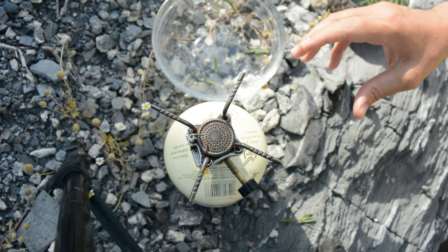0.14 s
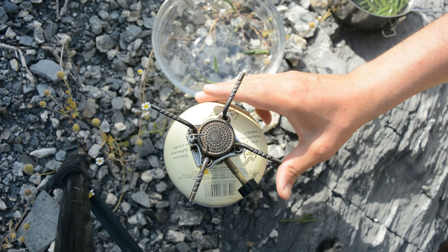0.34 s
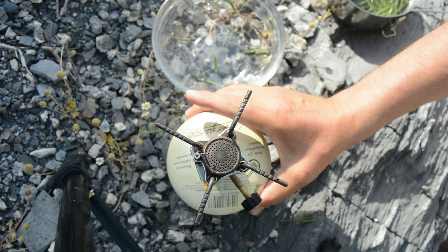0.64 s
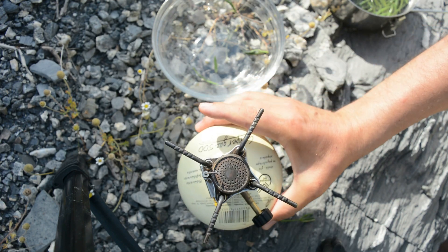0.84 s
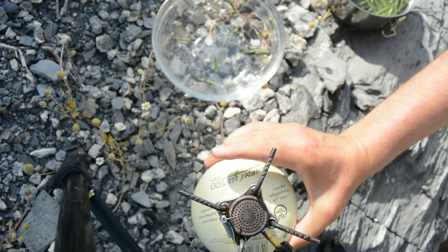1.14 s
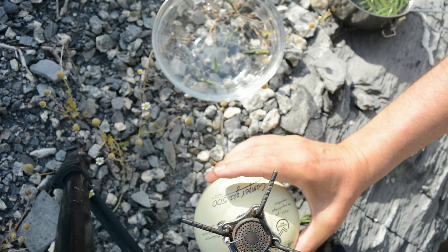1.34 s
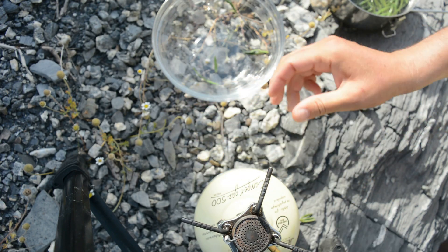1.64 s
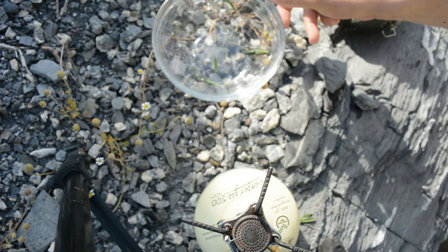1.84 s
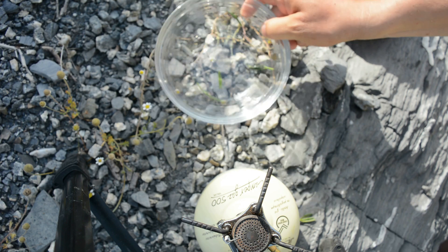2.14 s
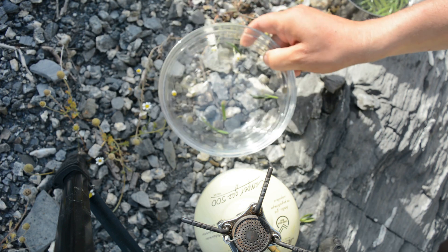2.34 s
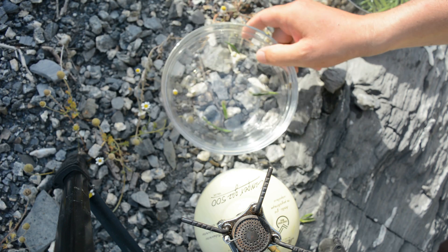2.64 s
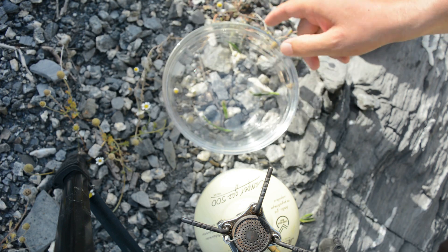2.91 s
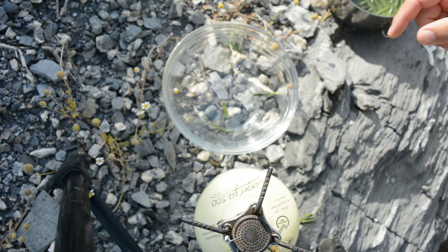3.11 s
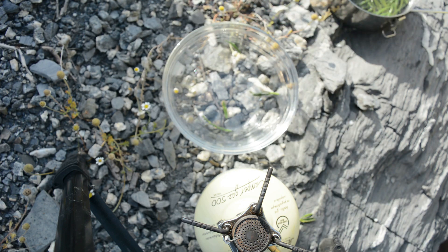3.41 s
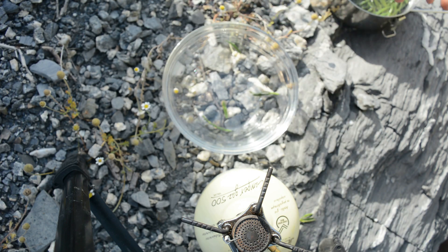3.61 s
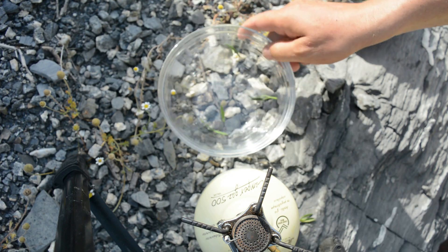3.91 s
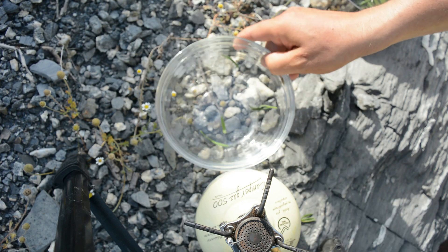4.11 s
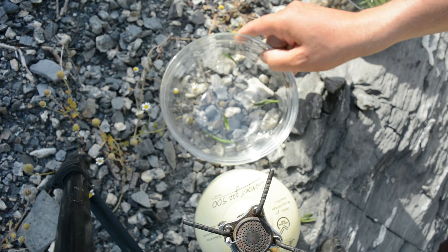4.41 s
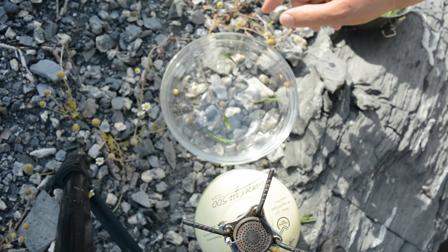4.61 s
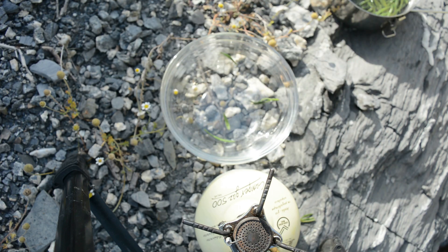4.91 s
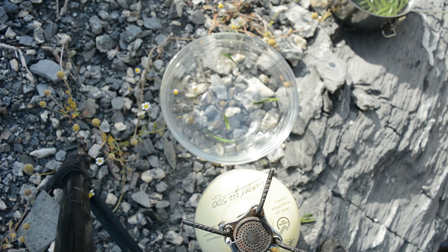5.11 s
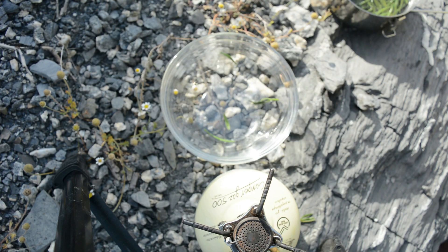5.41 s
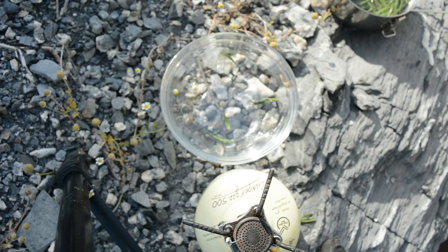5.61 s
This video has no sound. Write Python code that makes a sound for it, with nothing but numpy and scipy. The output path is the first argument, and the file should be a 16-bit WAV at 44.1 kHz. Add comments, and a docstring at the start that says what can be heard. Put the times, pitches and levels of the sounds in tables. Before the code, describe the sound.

A quiet open stony slope, with a faint, soft, slightly wavering rush of air throughout. From about 0.5 s a gas canister with stove arms is shoved over slate gravel in short jerks: faint grit first, then scrapes from 0.67 s with ringing steel, small pings around 0.9 s, and the strongest crunches, pings and a low thud near 1.2 s, dwindling by 1.5 s. From 1.9 to 2.75 s a clear bowl is nudged: quiet hollow rim rubs, dry ticks and high tinkling slate chips, with a bright clink at 2.03 s. Near-silence follows until 3.9 s, when more nudges lead to a light, briefly ringing clank at 4.13 s, then fainter rubs until 4.5 s. From 5.04 s fingers rub the camera; hard, close, short knocks hit at 5.16, 5.33 and 5.39 s, the loudest at 5.48 s, overloading with a thump, then a smaller one at 5.67 s.

```python
"""A hand drags a gas canister with its stove over slate gravel: grit slips and stone hits ring the steel shell.
A clear bowl is then nudged along: its rim rubs and ticks, slate chips tinkle, and it drops with a clank.
At the end the hand takes hold of the camera: filtered slips and short modes make the rubs and hard knocks.
Behind it lies a quiet stony slope, its air made of slowly wandering coloured noise."""
import sys
import numpy as np
from scipy import signal
from scipy.fft import rfft, irfft, next_fast_len
from scipy.io import wavfile
from scipy.ndimage import uniform_filter1d, map_coordinates

SR = 44100
rng = np.random.default_rng(int(sys.argv[2]) if len(sys.argv) > 2 else 0)


def inscribe(sig):
    """Save sig as 16-bit PCM at rate SR to the path in sys.argv[1].

    A 1-D sig is mono; a 2-D sig holds one channel per row.
    Samples are clipped to [-1, 1] before scaling.
    """
    pcm = np.round(np.clip(np.atleast_2d(sig).T, -1, 1) * 32767)
    wavfile.write(sys.argv[1], SR, pcm.astype(np.int16))


N = 253571
TIME = np.arange(N) / SR
AGE = np.arange(SR // 2) / SR  # seconds since a blow


def amp(db):
    """Decibels to gain."""
    return 10 ** (np.asarray(db) / 20)


def unit(x):
    """Scale to rms 1."""
    return x / np.std(x)


def peak(x):
    """Scale so that the loudest two milliseconds crest near 1."""
    loudest_power = uniform_filter1d(x * x, size=96).max()
    return x / (2 * np.sqrt(loudest_power))


def add(track, start_s, sound):
    """Mix a sound into a track."""
    i = int(start_s * SR)
    track[i:i + len(sound)] += sound[:N - i]


def through(x, response):
    """Pass a force through an impulse response."""
    return signal.oaconvolve(x, response)[:len(x)]


def colour(x, points, size=2048):
    """Minimum-phase filter through (frequency [Hz], level [dB]) points."""
    hz, db = np.transpose(points)
    bins_hz = np.maximum(np.fft.rfftfreq(size, 1 / SR), 1)
    gain = amp(np.interp(np.log(bins_hz), np.log(hz), db))
    cepstrum = irfft(np.log(gain))
    cepstrum[1:size // 2] *= 2
    cepstrum[size // 2 + 1:] = 0
    return through(x, irfft(np.exp(rfft(cepstrum))))


def fade(t60_s):
    """Exponential decay after a blow."""
    return np.exp(-np.log(1000) * AGE / t60_s)


def ring(modes, scatter_db, weight_db=0):
    """Decaying modes; each point of contact gives them other strengths and signs."""
    hz, db, t60_s = np.transpose(modes)
    scatter = scatter_db * rng.standard_normal(len(hz))
    gain = amp(db + weight_db + scatter) * rng.choice([-1, 1], len(hz))
    swing = gain @ (np.sin(2 * np.pi * hz[:, None] * AGE) * fade(t60_s[:, None]))
    # a small body radiates little below its lowest mode
    return signal.sosfilt(signal.butter(1, hz.min() / 2, "high", fs=SR, output="sos"), swing)


def favour(modes, hz, boost_db):
    """Mode weights in dB for a contact that picks out the mode nearest to hz."""
    distance_hz = abs(np.array(modes)[:, 0] - hz)
    return boost_db * (distance_hz == distance_hz.min())


def burst(points, t60_s):
    """A crack: decaying noise for many short unresolved modes under one spectrum."""
    return peak(colour(rng.standard_normal(len(AGE)) * fade(t60_s), points))


def soften(x, cutoff_hz, order=2):
    """A softer contact pushes for longer and loses the treble."""
    return signal.sosfilt(signal.butter(order, cutoff_hz, fs=SR, output="sos"), x)


def springy(x, hz, q):
    """A springy contact lifts its own resonance and cuts what lies above."""
    b, a = signal.bilinear([1], [1, 1 / q, 1], fs=.5 / np.tan(np.pi * hz / SR))
    return signal.lfilter(b, a, x)


def walk(rate_hz):
    """Random wander, straight between random points, spread near 1."""
    points = rng.standard_normal(4096)
    return np.interp(TIME * rate_hz, np.arange(len(points)), points)


def friction(slips_per_s, spread_db, catch_db, catch_hz):
    """Dense tiny slips of uneven size whose strength wanders as the surfaces catch."""
    slips = (rng.random(N) < slips_per_s / SR) * rng.choice([-1, 1], N)
    size_db = spread_db * np.minimum(rng.exponential(size=N), 4)
    return unit(slips * amp(size_db + catch_db * walk(catch_hz)))


def strokes(rows, attack_s, release_t60_s, swell_db_per_s):
    """One gain track per dB column: each stroke sets in, swells to its level, then dies away."""
    power = 0
    for start_s, length_s, *levels_db in rows:
        left_s = start_s + length_s - TIME
        attack = np.clip((TIME - start_s) / attack_s, 0, 1)
        swell = amp(-swell_db_per_s * np.clip(left_s, 0, length_s))
        release = np.exp(np.log(1000) * np.minimum(left_s, 0) / release_t60_s)
        power = power + np.outer(amp(levels_db), attack * swell * release) ** 2
    return np.sqrt(power)


def slosh(x, rate_hz, bend, crest_s):
    """Liquid gas swings in the canister and bends its modes up and down by a small share."""
    turn = 2 * np.pi * rate_hz
    warped_s = TIME + bend / turn * np.sin(turn * (TIME - crest_s))
    return map_coordinates(x, [warped_s * SR], order=3)


def place(x, pan_db, lead_samples):
    """The camera body shades the treble at one port; positive values favour the left and let it lead."""
    size = next_fast_len(N)
    hz = np.fft.rfftfreq(size, 1 / SR)
    treble = hz ** 2 / (hz ** 2 + 5000 ** 2)
    shade = amp(pan_db / 2 * treble) * np.exp(1j * np.pi * hz * lead_samples / SR)
    return irfft(rfft(x, size) * np.array([shade, 1 / shade]), size)[:, :N]


# open air, common and opposed parts: (frequency [Hz], density [dB per Hz])
AIR_MID = [(15, -48), (25, -25), (59, -10), (95, -7.5), (115, -3), (168, -4.5), (208, -1), (385, -2.5),
           (490, -0.5), (640, -0.5), (957, -0.5), (1470, -2), (1640, -3.5), (4070, -12), (15100, -27.5)]
AIR_SIDE = [(15, -39), (25, -5), (101, -15.5), (294, -5), (517, -3), (712, -0.5), (2720, -7.5),
            (11000, -22.5), (15100, -32)]
AIR_DB = -58


def air():
    """A soft far rush over the slope: noise with a common part and a weaker opposed part at the ports."""
    mid = unit(colour(rng.standard_normal(N), AIR_MID))
    side = unit(colour(rng.standard_normal(N), AIR_SIDE))
    level = amp(AIR_DB + 0.95 * walk(rate_hz=2.83))
    return level * (mid + amp(-2) * side * np.array([[1], [-1]]))


# fingers sliding over the housing: (start [s], length [s], level [dB])
FINGER_SLIDES = [(5.036, .085, -40.5), (5.123, 0.093, -35.5), (5.326, .03, -42), (5.385, .02, -41.5),
                 (5.47, 0.05, -45.5), (5.622, 0.1, -52)]
FINGER_ATTACK_S, FINGER_RELEASE_T60_S, FINGER_SWELL_DB_PER_S = 0.0073, 0.23, 22
# skin on housing: (frequency [Hz], level [dB])
SKIN = [(60, -14), (170, -1), (330, 2), (700, 6), (1200, 4), (2200, -2), (4000, -16), (8500, -22.5),
        (12000, -37), (13500, -47), (15500, -42)]
# knocks: (time [s], level [dB], contact resonance [Hz], thump re body [dB], snap re body [dB])
KNOCKS = [(5.1264, -21.5, 1390, -3, -27), (5.1361, -26, 1090, 1.5, -32), (5.158, -1, 3140, -27, -19),
          (5.1609, -11.5, 2500, -30, -29), (5.164, -12, 2210, -30, -10), (5.173, -18, 1200, -4, -27),
          (5.2131, -19, 1580, -8, -12.5), (5.326, -9, 2730, -11.5, -5), (5.358, -26, 2500, -2, -30),
          (5.3933, -4.5, 2040, -16, -10.5), (5.4039, -16, 2500, -5, -21), (5.451, -20, 1550, -10, -21),
          (5.4545, -10, 2330, -8.5, -18.5), (5.4831, 4.5, 3700, -24, -.5), (5.486, -2, 1600, -24, -16),
          (5.627, -26.5, 660, -10, -22), (5.665, -10.5, 2330, -27.5, -30)]
# housing modes and low thump modes: (frequency [Hz], level [dB], t60 [s])
HOUSING = [(604, -16, 0.093), (765, -3, 0.013), (1020, 0.5, 0.054), (1200, 5, 0.032), (1500, 3.5, 0.029),
           (1580, 2, 0.03), (1734, 2, 0.037), (1920, 4, 0.025), (2220, 0, 0.022), (2500, 3, 0.014),
           (2850, 2, 0.02), (3100, 3.5, 0.0089), (3385, 1, 0.018), (3840, -2.5, 0.019), (4280, -3, 0.023),
           (4840, -6.5, 0.024), (5190, -5, 0.034)]
THUMP = [(195, -12, 0.066), (277, -0.5, 0.11), (365, 3, 0.092), (437, 0, 0.089), (534, -6, 0.068)]
# snap of a hard contact, faint after-ring: (frequency [Hz], level [dB])
SNAP = [(100, -14), (400, 0.5), (1500, 1.5), (3500, -2), (6000, -1), (9000, -1.5), (11000, -10),
        (13500, -10), (15500, -24)]
AFTER_RING = [(100, -17), (370, 7), (650, -20), (1100, 8), (1700, -5), (2500, -3), (5200, -7.5),
              (8200, -7.5), (15000, -30)]
# small housing creaks: (time [s], level [dB], cut-off [Hz])
CREAKS = [(5.121, -38, 12000), (5.193, -31.5, 10000), (5.231, -37, 12000), (5.435, -37.5, 6000),
          (5.610, -31.5, 6860), (5.6369, -23.5, 5000), (5.643, -34, 7000), (5.700, -40.5, 8000),
          (5.716, -33, 8950)]
# low thump as the hardest knock overloads the input: (frequency [Hz], level [dB])
OVERLOAD_THUMP = [(20, -11), (110, -7), (220, -2), (380, 4), (650, -7), (2000, -39), (15000, -59)]
OVERLOAD_THUMP_S, OVERLOAD_THUMP_DB = 5.4835, -13


def camera():
    """Fingers rub the housing and knock it: a snap, short body modes, a low thump and a faint after-ring."""
    rub_gain, = strokes(FINGER_SLIDES, FINGER_ATTACK_S, FINGER_RELEASE_T60_S, FINGER_SWELL_DB_PER_S)
    slips = friction(slips_per_s=3000, spread_db=1.5, catch_db=4, catch_hz=80)
    rub = unit(colour(slips, SKIN)) * rub_gain
    knocks = np.zeros(N)
    for time_s, db, contact_hz, thump_db, snap_db in KNOCKS:
        body = peak(ring(HOUSING, scatter_db=0.5)) + amp(-3) * burst(SKIN, t60_s=0.041)
        thump = peak(ring(THUMP, scatter_db=1.0))
        snap = soften(burst(SNAP, t60_s=0.017), 3.76 * contact_hz, order=6)
        knock = peak(springy(body, contact_hz, q=1.66)) + amp(thump_db) * thump + amp(snap_db) * snap
        after_ring = amp(-42.0) * burst(AFTER_RING, t60_s=0.49)
        add(knocks, time_s, amp(db) * (knock + after_ring))
    for time_s, db, cutoff_hz in CREAKS:
        add(knocks, time_s, amp(db) * soften(burst(SNAP, t60_s=0.017), cutoff_hz))
    # the stiff little housing hardly moves in the bass
    knocks = signal.sosfilt(signal.butter(2, 210, "high", fs=SR, output="sos"), knocks)
    add(knocks, OVERLOAD_THUMP_S, amp(OVERLOAD_THUMP_DB) * burst(OVERLOAD_THUMP, t60_s=0.014))
    return place(rub + knocks, pan_db=4.5, lead_samples=-0.084)


# slate chip modes: (frequency [Hz], level [dB], t60 [s])
CHIP = [(5290, -6.5, 0.068), (8220, 3.5, 0.037), (8520, -6.5, 0.026), (9890, -9.5, 0.068),
        (10650, -21, 0.024), (11600, -27, .05), (11600, -17, 0.073), (12700, -20, .06)]
# clinks: (time [s], level [dB], favoured mode [Hz], its boost [dB])
CLINKS = [(1.913, -48, 8220, 10), (1.92, -43.5, 8220, 22), (1.984, -40.5, 8220, 3),
          (2.030, -26.5, 5290, 14.5), (2.308, -40, 8220, 4), (2.328, -32, 8220, 10), (2.359, -42, 5290, 17),
          (2.386, -47, 10650, 39), (2.404, -53, 10650, 34), (2.723, -51.5, 8220, 7), (3.959, -45, 8220, 8),
          (3.993, -29, 9890, 8.5)]
# crushed grit: (frequency [Hz], level [dB])
CRUNCH = [(50, -42), (300, -25), (800, -2), (1500, -11), (2800, -7.5), (5000, 5.5), (8000, 2), (11000, -1),
          (13000, -32), (15500, -33)]


def chips(tinkle_gain):
    """Thin slate chips tinkle as the rim pushes them over each other."""
    chip_ring = ring(CHIP, scatter_db=.5)
    slips = friction(slips_per_s=760, spread_db=4.5, catch_db=4.0, catch_hz=67)
    out = unit(through(slips, chip_ring)) * tinkle_gain
    for time_s, db, hz, boost_db in CLINKS:
        clink = peak(ring(CHIP, 0.39, favour(CHIP, hz, boost_db)))
        add(out, time_s, amp(db) * (clink + amp(-11.0) * burst(CRUNCH, t60_s=0.035)))
    return place(out, pan_db=1.4, lead_samples=.2)


# rim rubbing on stones: (frequency [Hz], level [dB])
RUB = [(50, -52), (150, -29), (450, -14), (750, 2.5), (950, 9), (1300, -4), (1850, -2), (2700, -19),
       (3500, -11.5), (6000, -34), (15000, -43)]
# rim catching on stones: (time [s], peak [dB], contact cut-off [Hz])
BOWL_TICKS = [(2.026, -32, 6000), (2.075, -34, 1800), (2.302, -25.5, 3000), (2.306, -24, 2940),
              (2.3185, -32, 3500), (2.328, -38, 4000), (2.334, -26, 3000), (2.353, -27, 3500),
              (2.361, -30, 3500), (2.384, -34.5, 6000), (2.458, -35.5, 2500), (2.467, -25, 3900),
              (2.481, -39, 3000), (2.511, -35, 1500), (2.597, -32.5, 1990), (2.609, -28.5, 2970),
              (2.669, -31, 1480), (2.722, -30, 2100), (2.7323, -29, 1770), (2.752, -29.5, 1480),
              (3.958, -29, 2500), (3.982, -41, 2000), (3.9923, -27.5, 8000), (4.0853, -25.5, 2600),
              (4.113, -46, 2000), (4.320, -34.5, 1800), (4.397, -45.5, 6000), (4.419, -43, 6000)]
# bowl damped by fingers; bowl free, before the length factor: (frequency [Hz], level [dB], t60 [s])
BOWL_HELD = [(746, -39.5, 1), (783, -6, 0.011), (884, -2, 0.021), (1051, -3.5, 0.019), (1200, -8, 0.018),
             (1463, -14.5, 0.034), (1820, -17, 0.031), (2100, -6, 0.0064), (3330, -9, 0.0016),
             (4040, -0.5, 0.002)]
BOWL_FREE = [(748.6, 0.5, 0.12), (767, -30, 0.31), (771, -1, 0.064), (1491, -21, 0.37), (1690, -13, .16),
             (1765, -9, 0.035), (1840, -4, 0.057), (1820, -12, 0.026), (2040, -13, 0.071), (2153, -14, .12),
             (2321, -27.5, 0.64), (2730, -7, 0.16), (2880, -20, 0.051), (3385, -20, 0.11), (3670, -19, .17),
             (4113, -19, 0.13), (4710, -18, .08), (5095, -18, 0.097), (5570, -25, 0.1), (6971, -26, .06),
             (7280, -19, 0.094), (8760, -20, 0.095), (9350, -8, 0.03), (9860, -15.5, 0.1),
             (10800, -21, 0.06)]
# let go, drop and chatter:
# (time [s], level before softening [dB], crack re ring [dB], contact cut-off [Hz], ring length factor [1])
DROPS = [(2.753, -44, -27, 800, 11), (4.1305, -15, -9, 15000, 1.2), (4.153, -29, -1, 12100, 0.67),
         (4.160, -27, -2.5, 11800, 0.78), (4.397, -39, -3, 6900, 0.52)]
# cracking stone, stone bed: (frequency [Hz], level [dB])
GRIT = [(50, -50), (170, -18), (400, -8.5), (820, 10.5), (1400, 1), (2600, 2.5), (5000, -4), (8000, -10.5),
        (11000, -17.5), (12800, -29), (15500, -32)]
THUD = [(50, -44), (130, -35), (250, -16), (420, -2), (650, -0.5), (850, -2), (1400, -25), (4000, -39),
        (15000, -60)]


def bowl(rub_gain):
    """The held rim rubs and ticks with little ring; let go, it drops on a stone and rings freely."""
    slips = friction(slips_per_s=560, spread_db=2.0, catch_db=-0.5, catch_hz=170)
    out = unit(colour(slips, RUB)) * rub_gain
    for time_s, db, contact_hz in BOWL_TICKS:
        tick = peak(ring(BOWL_HELD, scatter_db=3.5)) + amp(-17.5) * burst(GRIT, t60_s=0.029)
        add(out, time_s, amp(db) * peak(soften(tick, contact_hz)))
    for time_s, db, crack_db, contact_hz, length_factor in DROPS:
        crack = burst(GRIT, t60_s=0.071)
        crack += amp(-6) * burst(THUD, t60_s=0.076)
        crack += amp(-4.5) * burst(SNAP, t60_s=0.024)
        modes = np.array(BOWL_FREE) * [1, 1, length_factor]
        clank = peak(ring(modes, scatter_db=3.0)) + amp(crack_db) * crack
        add(out, time_s, amp(db) * soften(clank, contact_hz))
    return place(out, pan_db=3.0, lead_samples=0.32)


# short shoves: (start [s], length [s], shell ring [dB], grit [dB])
SHOVES = [(.49, 0.24, -62.5, -60.5), (.668, 0.055, -46.5, -50), (.749, 0.067, -41, -43),
          (.864, 0.068, -44, -51.5), (.952, 0.053, -40.5, -44.5), (1.035, 0.11, -44.5, -48),
          (1.166, 0.062, -37.5, -42), (1.277, 0.047, -41, -44.5), (1.362, 0.038, -48.5, -49.5),
          (1.448, 0.024, -54.5, -52.5)]
SHOVE_ATTACK_S, SHOVE_RELEASE_T60_S, SHOVE_SWELL_DB_PER_S = 0.0072, 0.23, 6
# steel shell and stove arms, undamped: (frequency [Hz], level [dB], t60 [s])
CANISTER = [(800, -10, 0.033), (850, -10.5, 0.063), (2012, -15, 0.11), (2500, -4, 0.091), (2689, -2, 0.084),
            (2730, -4.5, 0.058), (2757, -8.5, 0.14), (3000, -18, 0.16), (3210, -18, 0.12),
            (3500, -12.5, 0.044), (3770, -20, 0.1), (3990, -19.5, .12), (4480, -21, .06),
            (4950, -12.5, 0.08), (4970, -29, 0.039), (6000, -27, .05), (6700, -18.5, 0.05),
            (7600, -25, 0.043), (8000, -25, .04), (8900, -23, 0.055), (9700, -35, 0.045)]
# canister hitting stones: (time [s], shell peak [dB], crunch peak [dB], thud peak [dB])
CANISTER_HITS = [(0.749, -33.5, -49, -37.5), (0.761, -32, -52, -35), (.794, -30, -42, -39),
                 (.820, -48, -38, -54), (.953, -31, -41, -56), (.988, -31, -42, -65),
                 (1.167, -23.5, -31, -47), (1.182, -28, -24.5, -55), (1.2055, -22, -24, -38),
                 (1.2171, -24.5, -40, -16.5), (1.289, -35, -47, -33.5), (1.297, -30.5, -52, -27.5),
                 (1.317, -39, -54, -33), (1.371, -34, -61, -36), (1.399, -47, -62, -47),
                 (1.417, -36.5, -66, -56), (1.476, -29.5, -41, -63), (1.485, -46.5, -57, -43)]
# a stone's point rings mainly one shell mode: (time [s], peak [dB], mode [Hz])
PINGS = [(.900, -26, 2500), (0.975, -34, 2680), (1.018, -38, 4480), (1.067, -38, 4950), (1.18, -22.5, 2743),
         (1.212, -19.5, 2500), (1.476, -41, 3990), (1.477, -39, 2500)]


def canister():
    """With each shove grit slips under the steel base and rings the shell; bigger stones ping, crunch and thud."""
    shell_gain, grit_gain = strokes(SHOVES, SHOVE_ATTACK_S, SHOVE_RELEASE_T60_S, SHOVE_SWELL_DB_PER_S)
    slips = friction(slips_per_s=1100, spread_db=0.0, catch_db=2.0, catch_hz=130)
    shell = unit(through(slips, ring(CANISTER, scatter_db=1.0))) * shell_gain
    stones = unit(colour(slips, GRIT)) * grit_gain
    for time_s, shell_db, crunch_db, thud_db in CANISTER_HITS:
        # pressed on the stone, the shell is damped
        damped = ring(CANISTER, scatter_db=6.5) * fade(t60_s=0.05)
        add(shell, time_s, amp(shell_db) * peak(damped))
        add(stones, time_s, amp(crunch_db) * burst(CRUNCH, t60_s=0.068))
        add(stones, time_s, amp(thud_db) * burst(THUD, t60_s=0.028))
    for time_s, db, hz in PINGS:
        ping = ring(CANISTER, 0.65, favour(CANISTER, hz, boost_db=28))
        add(shell, time_s, amp(db) * peak(ping))
    shell = slosh(shell, rate_hz=4.3, bend=0.0138, crest_s=0.74)
    return place(shell + stones, pan_db=2.0, lead_samples=0.41)


# bowl nudged along: (start [s], length [s], rim rub [dB], chip tinkle [dB])
NUDGES = [(1.915, 0.11, -51, -59.5), (2.075, .03, -48, -59), (2.303, 0.061, -39, -50.5),
          (2.435, 0.052, -46.5, -62), (2.595, 0.012, -51.5, -71), (2.72, 0.028, -57, -72),
          (3.91, 0.1, -50.5, -59), (4.062, 0.042, -47, -61.5), (4.21, 0.032, -49.5, -75),
          (4.272, .056, -47, -70), (4.465, 0.018, -62, -63)]
# the rim rubs harder as it ploughs up stones, then stops short
NUDGE_ATTACK_S, NUDGE_RELEASE_T60_S, NUDGE_SWELL_DB_PER_S = 0.0086, .11, 55


def scene():
    """Everything at the two ports; the same nudges rub the bowl's rim and stir the chips."""
    rub_gain, tinkle_gain = strokes(NUDGES, NUDGE_ATTACK_S, NUDGE_RELEASE_T60_S, NUDGE_SWELL_DB_PER_S)
    return air() + camera() + chips(tinkle_gain) + bowl(rub_gain) + canister()


TOP_HZ = 15500


def record(dry):
    """Peaks beyond full scale overload the input and clip; then the top is cut steeply."""
    clipped = np.clip(dry, -1, 1)
    return signal.sosfilt(signal.ellip(8, .2, 70, TOP_HZ, fs=SR, output="sos"), clipped)


dry = scene()
out = record(dry)
inscribe(out)
```